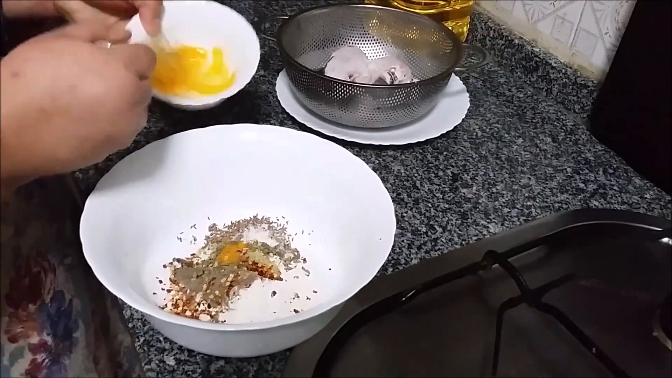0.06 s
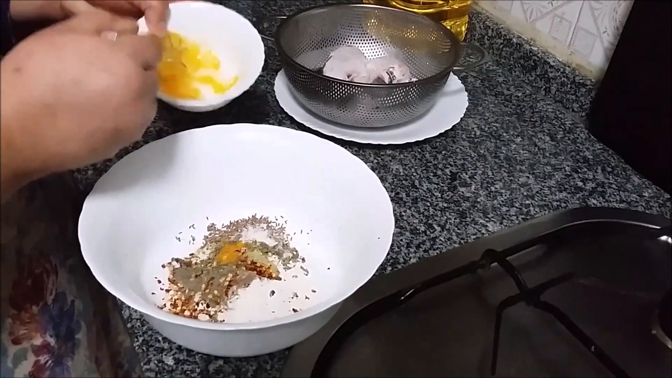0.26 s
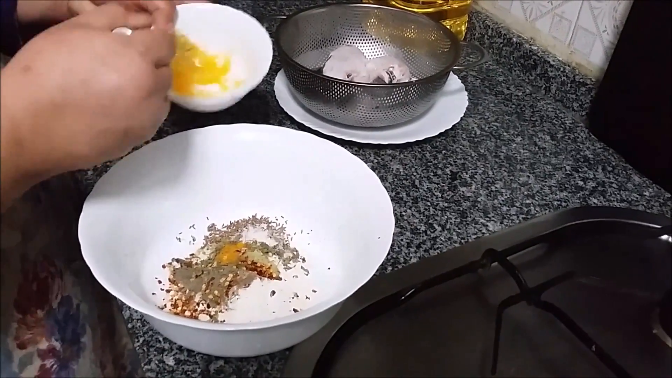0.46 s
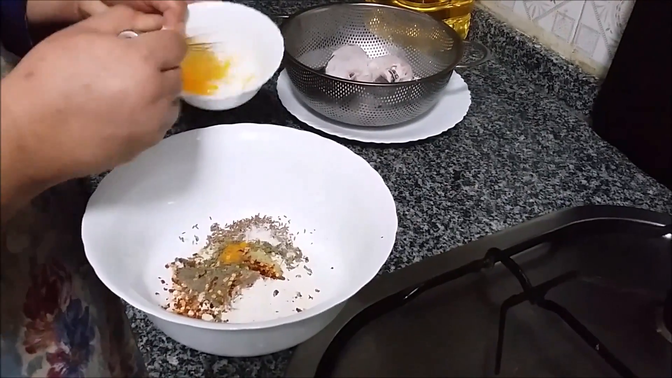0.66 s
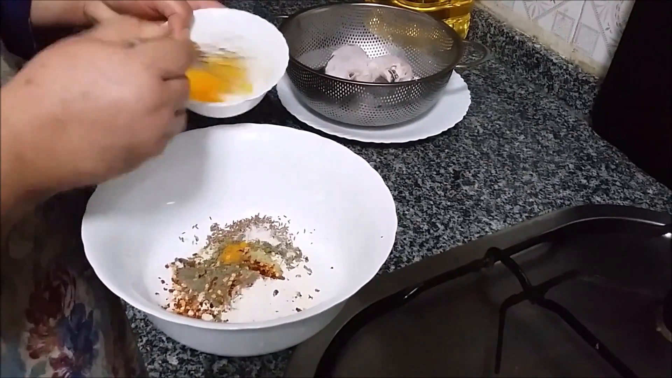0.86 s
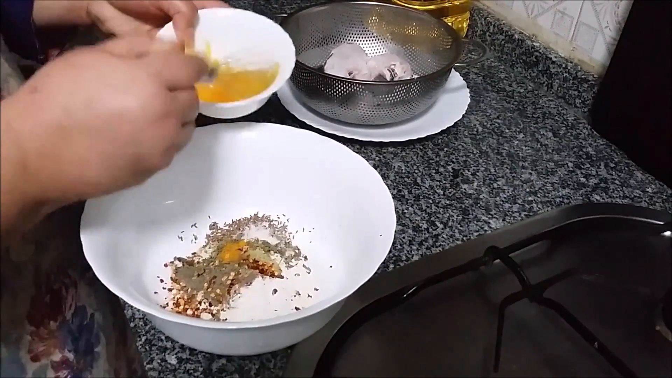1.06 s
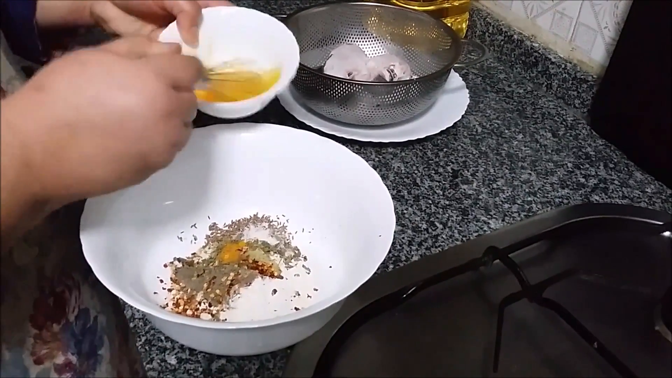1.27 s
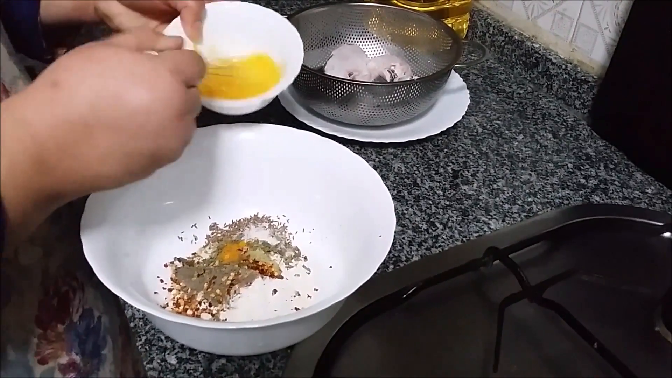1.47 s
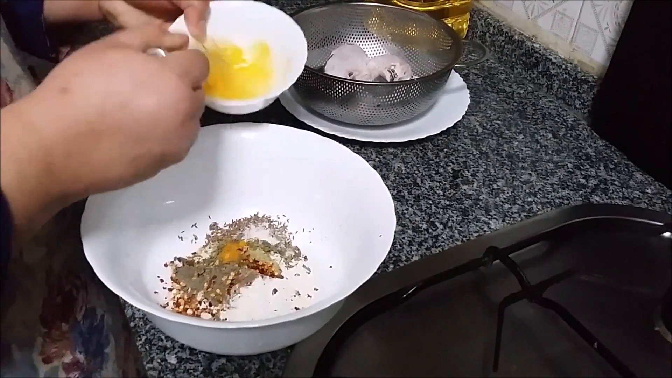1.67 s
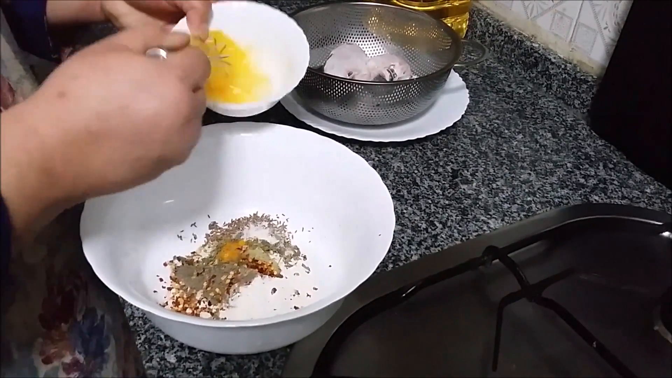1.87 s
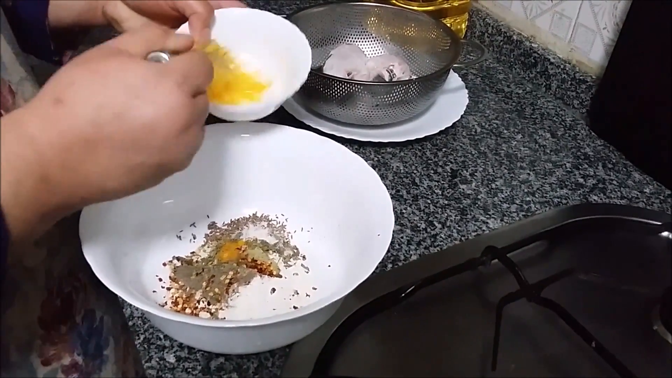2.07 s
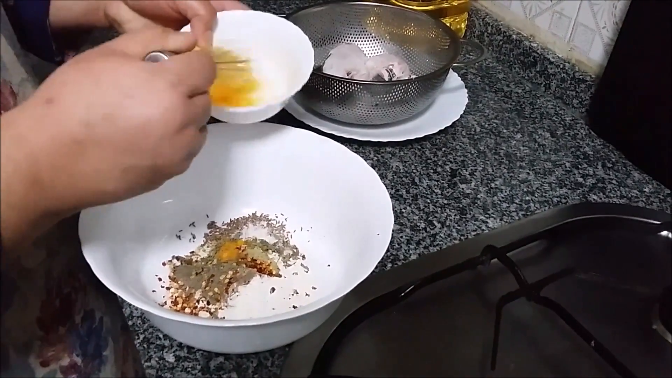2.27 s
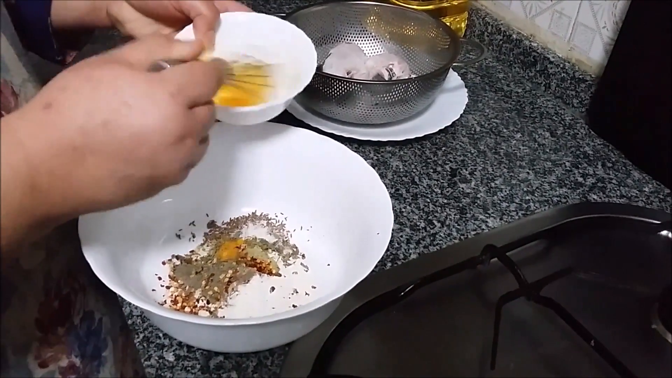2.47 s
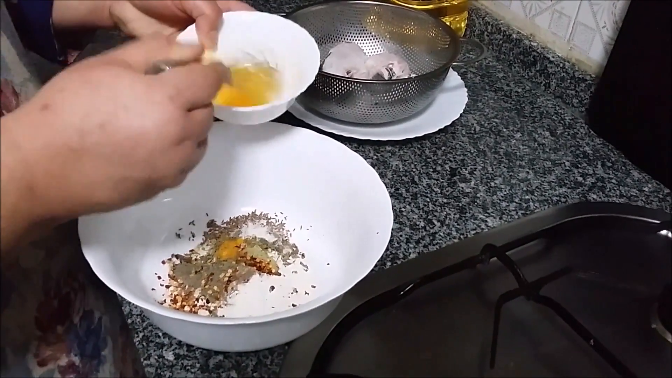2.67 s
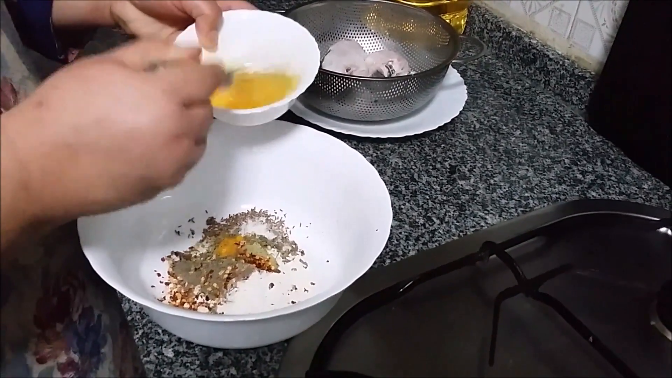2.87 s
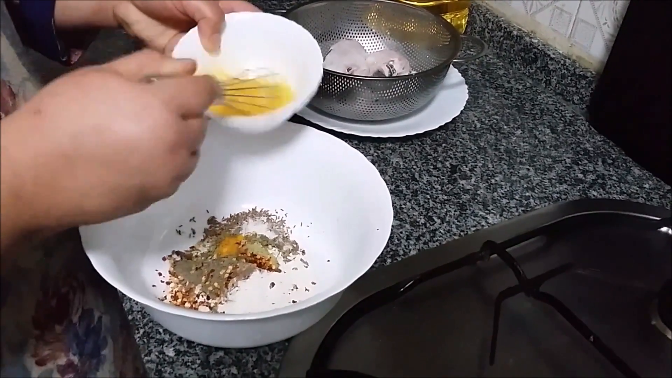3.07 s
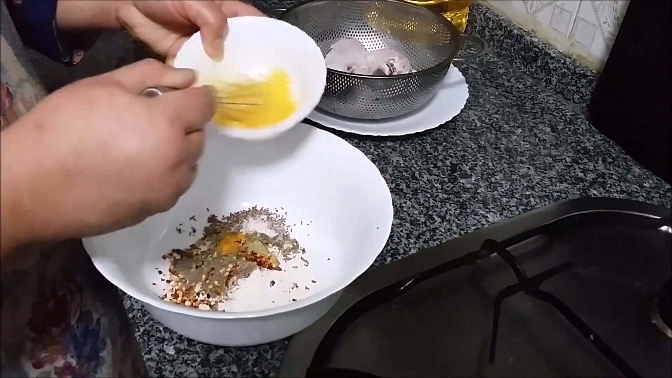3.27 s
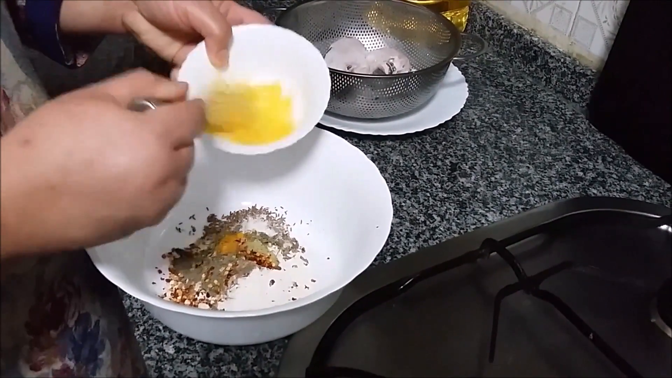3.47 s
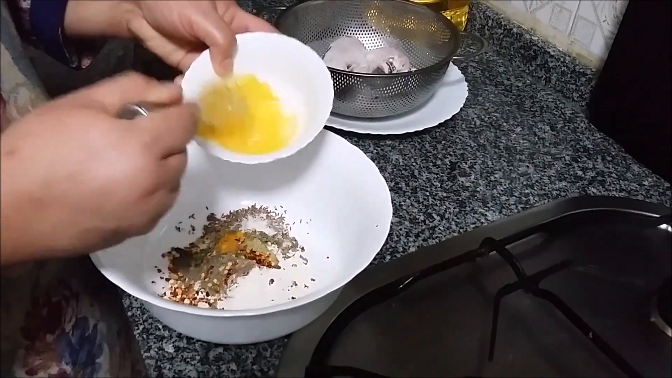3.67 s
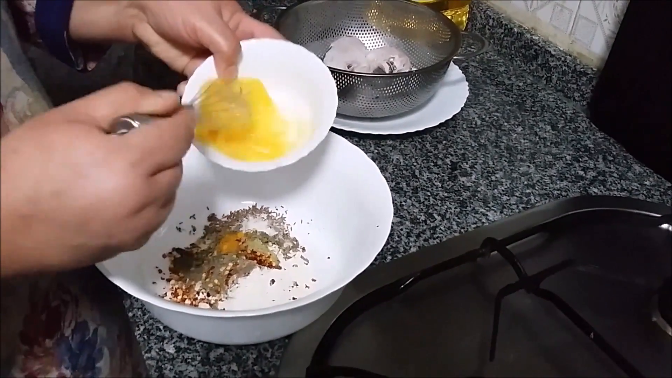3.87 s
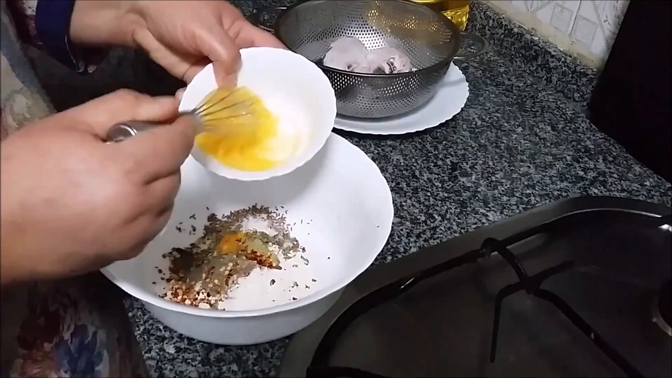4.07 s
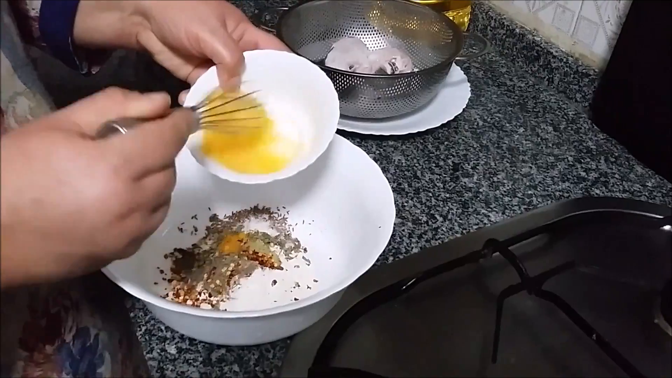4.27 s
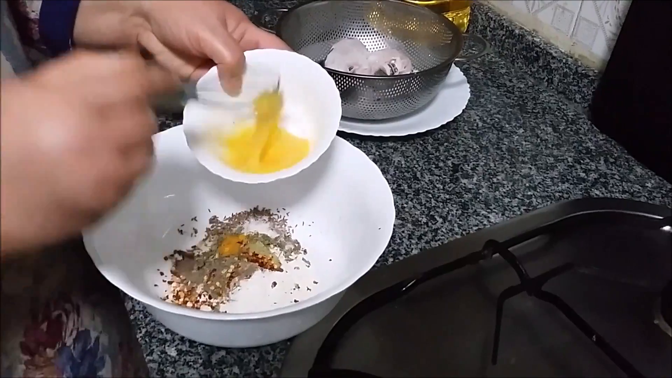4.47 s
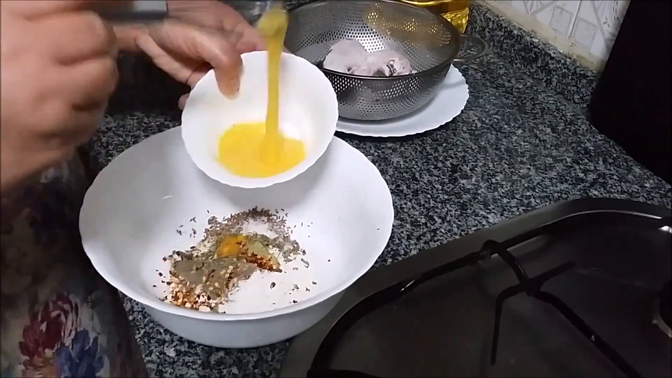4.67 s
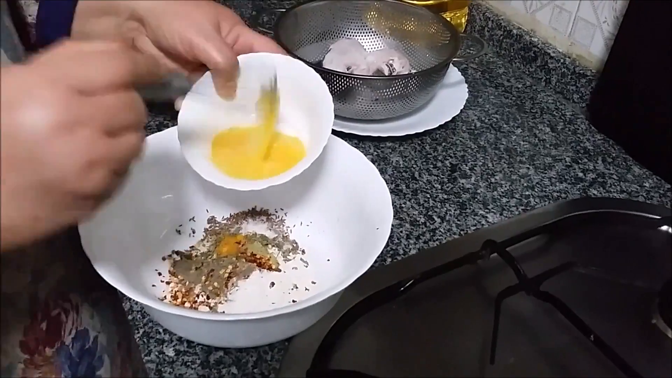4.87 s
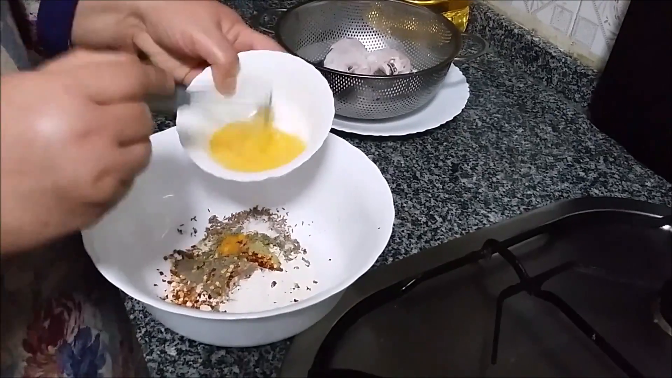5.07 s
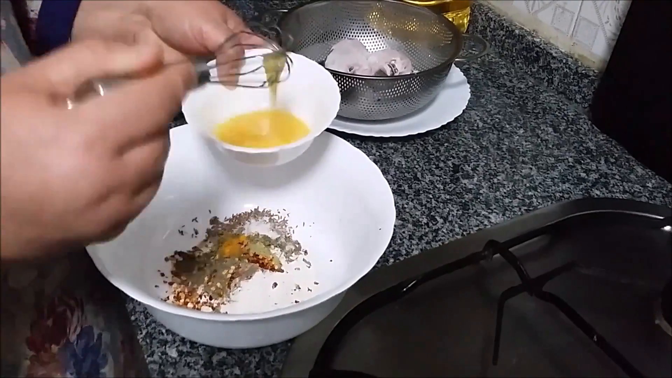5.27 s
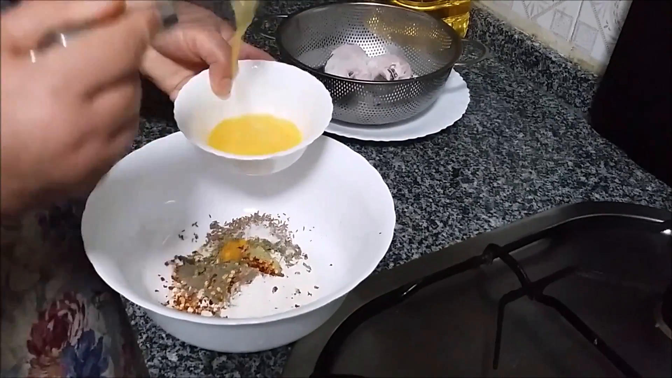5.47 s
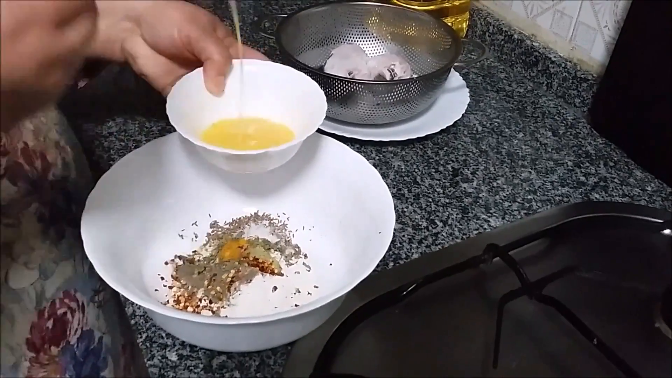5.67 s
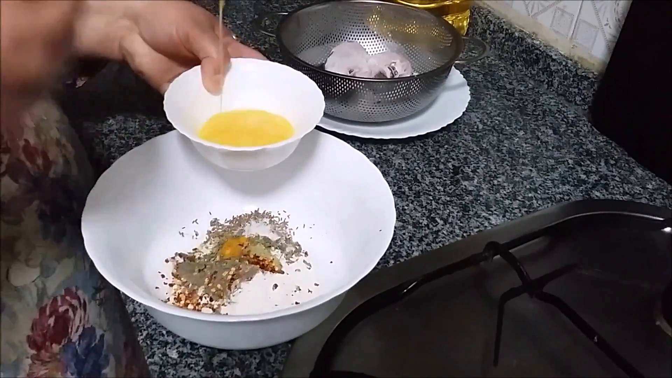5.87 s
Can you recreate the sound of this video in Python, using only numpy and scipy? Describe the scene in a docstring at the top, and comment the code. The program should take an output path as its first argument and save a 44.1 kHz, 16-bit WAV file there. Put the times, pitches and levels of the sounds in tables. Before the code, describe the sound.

A wire whisk beats egg in a small hand-held bowl, heard close in stereo in a hard-walled home kitchen. From 0 to about 4.3 s it runs at roughly five and a half turns a second. Each turn is a quick pair of touches: a wet dip, then a bright, hissy sweep up the wall about 45 ms later, with a hollow squelch and light wire ring. Some turns slap the egg, notably at 0.15 and 2.3 s. At 1.28 s the bowl knocks other dishes: a loud crack, dull clatter and clear bell-like ring near 1.1 and 2 kHz, fading over half a second. Scrapes soften and get wetter later; soft hand rubs come at 3.3-3.5 s. Four hard, popping slaps land at 3.76, 3.94, 4.12 and 4.3 s, mostly growing louder. A faint touch follows at 4.5 s, then tiny drips at 5.0 and 5.18 s over low, steady room noise.

```python
"""A wire whisk scrapes a small hand-held bowl and beats an egg, five and a half turns a second.
Each turn dips through the egg and sweeps up the wall: stick-slip clicks drive hiss, hollow, wall and wires.
Some turns slap the egg, ringing the air in the bowl; once the bowl knocks other dishes and they ring.
After four hard slaps the whisk is lifted and the egg drips back, each drop ringing a tiny air pocket.
Rubs of the hand and steady room noise lie below; echoes of a hard-walled kitchen surround the beating."""
import sys
import numpy as np
from scipy import signal
from scipy.fft import rfft, irfft
from scipy.io import wavfile

SR = 44100
rng = np.random.default_rng(int(sys.argv[2]) if len(sys.argv) > 2 else 0)


def wav_record(signal):
    """Record a signal, one row per channel, as 16-bit PCM in the file named by sys.argv[1]."""
    frames = np.transpose(np.atleast_2d(signal))
    bounded = np.clip(frames, -1, 1)
    # unit amplitude maps onto the largest positive 16-bit level
    quanta = np.round(bounded * 32767).astype(np.int16)
    wavfile.write(sys.argv[1], SR, quanta)


N = 260838

# Room noise spectrum: f/Hz, relative density/(dB per Hz)
HUSH_SPECTRUM = [(25, -13), (90, 0.1), (150, 0), (210, -4), (310, -1), (700, -12), (1400, -16), (4600, -25),
                 (5400, -33), (16000, -36)]
HUSH_RMS_DB = -64.5
# Left-right likeness of noise: f/Hz, correlation/1
EAR_LIKENESS = [(30, .6), (80, .93), (320, .88), (900, .3), (3000, 0)]
# Kitchen reverberation: f/Hz, t60/s
ROOM_T60 = [(100, 0.21), (500, 0.8), (1500, 0.42), (4500, 0.42), (8000, 0.27), (15000, 0.41)]
RECORD_EDGE_HZ = 15900

# Hand shifting its hold on the bowl: t/s, half-length/s, level/dB, f/Hz
HAND_SHIFTS = [(3.32, 0.071, -51.5, 396), (3.42, 0.1, -60.5, 110), (3.488, 0.031, -57, 308)]

# Bowl knocking other dishes: t/s, level/dB
DISH_KNOCKS = [(1.2848, -14)]
# Dish modes: f/Hz, relative level/dB, t60/s, left minus right/dB
DISH_MODES = [(311, -12, .45, 0), (344, -11, .4, 0), (425, -6, .4, 1), (537, -12, .4, 0),
              (735, -12, .45, 0), (922, -11, .5, 2), (1120, 1, .68, 6), (1252, -4, .22, 2),
              (1435, -7, .2, 2), (2070, -4.5, .72, -4), (3214, -19, .5, 0), (4600, -19, .25, 0),
              (7572, -21, .2, 2)]
# Dull clatter spectrum: f/Hz, relative density/(dB per Hz)
CLATTER_SPECTRUM = [(45, -34), (85, -10), (130, -6), (215, -19), (340, -5), (600, -4), (1300, 0),
                    (1800, -5.5), (2600, -16), (5000, -23), (7500, -21), (9000, -44.5), (16000, -51.5)]

# Egg dripping back: t/s, f/Hz, level/dB
EGG_DRIPS = [(4.99, 2590, -55.5), (5.178, 1317, -45.5), (5.18, 2660, -53.5)]

# Wet slaps: t/s, level/dB, hollow f/Hz, bursting air pocket f/Hz
EGG_SLAPS = [(0.1555, -30.5, 1260, 1800), (0.524, -40, 1260, 880), (0.872, -40.5, 1380, 2980),
             (1.924, -41, 1360, 5230), (2.2989, -31, 1530, 6980), (3.024, -35.5, 1200, 2104),
             (3.7555, -28.5, 1520, 1950), (3.9432, -27, 1240, 2600), (4.121, -23.5, 1620, 4800),
             (4.305, -21, 1350, 750)]
# Air resonances above the hollow: f/Hz, width of one filter pass/Hz
AIR_MODES = [(2700, 520), (4700, 1200), (7100, 1000)]
# Levels before the burst lift, hollow then AIR_MODES: level/dB
SLAP_MODE_LEVELS_DB = [1, 0, -2.5, -9.5]
BURST_LIFT_DB, BURST_SPREAD_OCTAVES = 9.5, 0.45  # lifts resonances near the pocket's pitch

# Turns of the whisk: dip t/s, dip length/s, dip level/dB, dip-to-sweep lag/s, sweep level/dB
WHISK_TURNS = [(0.012, 0.018, -44.5, .026, -37), (0.158, 0.013, -37, 0.043, -31.5),
               (0.329, 0.021, -40.5, .047, -30), (0.512, .027, -40.5, 0.042, -33),
               (0.69, 0.021, -38, .046, -32.5), (0.873, 0.015, -36.5, .04, -32),
               (1.048, .026, -39, 0.05, -32.5), (1.222, 0.045, -41.5, 0.051, -31.5),
               (1.403, .023, -36, 0.048, -33.5), (1.586, 0.017, -36.5, 0.036, -32.5),
               (1.754, .033, -39, 0.047, -34), (1.938, 0.026, -35.5, 0.046, -35),
               (2.126, 0.015, -37.5, 0.042, -35.5), (2.299, 0.017, -38, 0.042, -33.5),
               (2.483, 0.011, -36, 0.038, -35), (2.663, 0.012, -39, .045, -38.5),
               (2.841, 0.011, -38.5, .047, -38.5), (3.024, .013, -36.5, .047, -38.5),
               (3.206, 0.013, -38, 0.044, -33.5), (3.395, 0.0079, -39.5, 0.038, -39.5),
               (3.573, 0.0095, -37.5, 0.039, -39), (3.755, 0.01026, -36.5, 0.038, -41.5),
               (3.945, 0.0087, -41.5, 0.033, -41), (4.325, 0.0075, -37.5, 0.034, -42.5)]
# Brief extra touches of the whisk on the bowl, mostly just before a dip, one faint touch at the end:
# t/s, length/s, level/dB, wire level/dB re stroke, pocket level/dB re stroke
EXTRA_TOUCHES = [(0.0, 0.016, -37, -18.5, 2), (1.201, .014, -29.5, 5, -9.5),
                 (1.922, 0.016, -39, -14.5, -9.5), (2.105, 0.017, -36, -18, 7),
                 (2.468, 0.0099, -34.5, -24, -8), (2.641, 0.0089, -38, -21, -10),
                 (4.51, .01, -53, -18, -12)]
# Ring of the wires on the sweep: t/s, level/dB re stroke
WIRE_RING = [(0.2, -10.5), (0.55, 2), (2.0, -0.5), (2.17, -28), (3.07, -23), (3.25, -8), (3.6, -7.5),
             (3.8, 0.5)]
# Hollow the whisk opens in the egg: t/s, f/Hz
HOLLOW_PITCH = [(0.2, 1300), (1.05, 1534), (1.45, 1250), (1.8, 1570), (2.5, 1410), (3.1, 1320), (3.7, 1490),
                (3.98, 1090), (4.33, 896)]
# Scrape spectrum: f/Hz, relative density/(dB per Hz)
SCRAPE_SPECTRUM = [(150, -33.5), (400, -10), (750, -17), (1300, -6), (2000, 3), (2600, 1.5), (3500, 2),
                   (4700, 1.5), (6300, -6), (7300, -8.5), (8700, -7.5), (11000, -22), (14000, -18.5),
                   (16000, -41)]
# Whisk wire modes: f/Hz, relative level/dB, t60/s
WIRE_MODES = [(1110, -15, .2), (3070, -8, .09), (3180, -11, .07), (5270, -11, .04), (5520, -3, .05),
              (5610, 0, .07), (6380, -15, .04), (8580, -16, .05)]
# Bowl wall damped by hand and egg: f/Hz, width of one filter pass/Hz, level/dB re hollow
WALL_MODES = [(415, 370, -24), (675.7, 110, -14.5), (1152, 110, -7)]

SWEEP_LENGTH_S = 0.012
BRUSH_LEAD_S, BRUSH_RE_DIP_DB = 0.011, -10.5  # leading wire brushes the egg before each dip
# Relative squelch; extra touches stir little egg. Squelch of the turns grows as the egg loosens.
DIP_SQUELCH_DB, SWEEP_SQUELCH_DB, TOUCH_SQUELCH_DB = 2.5, -3, -8
FROTH_DB_PER_S = 1.81
DIP_WIRES_DB = -30.5  # re stroke; egg damps the wires
SWEEP_PITCH_RATIO, HOLLOW_SCATTER_OCTAVES = 1.1, 0.074  # hollow is smaller on the sweep
POCKET_DB, POCKET_SCATTER_DB = -8.5, 2.5  # air pockets between wires, re stroke


def amp(db):
    """Decibels to gain."""
    return 10 ** (np.asarray(db) / 20)


def unit(x):
    """Scales to a mean channel energy of one."""
    return x / np.sqrt(np.mean(np.sum(x ** 2, -1)) + 1e-20)


def read(points, hz):
    """Reads a table on a log-frequency axis."""
    f_hz, value = np.transpose(points)
    return np.interp(np.log(hz + 1), np.log(f_hz + 1), value)


def at_time(points, t_s):
    """Reads a table on a linear time axis."""
    return np.interp(t_s, *np.transpose(points))


def left_right(db):
    """Gains that raise the left and lower the right by the same dB."""
    return amp([[db], [-db]])


def add(mix, t_s, sound):
    """Mixes a stereo sound in at t_s."""
    part = mix[:, max(round(t_s * SR), 0):][:, :sound.shape[1]]
    part += sound[:, :part.shape[1]]


def convolve(x, response):
    """Convolves each channel, keeping the length."""
    return signal.fftconvolve(np.atleast_2d(x), np.atleast_2d(response), axes=1)[:, :x.shape[-1]]


def colour(points, size=2048):
    """Causal minimum-phase impulse response with the given spectrum."""
    hz = abs(np.fft.fftfreq(size, 1 / SR))
    log_gain = np.log(amp(read(points, hz)))
    return np.fft.ifft(np.exp(np.conj(signal.hilbert(log_gain)))).real


def resonate(x, hz, width_hz):
    """Band-pass resonance applied twice, for steep skirts."""
    b, a = signal.iirpeak(min(hz, .45 * SR), hz / width_hz, SR)
    return signal.lfilter(b, a, signal.lfilter(b, a, x))


def ring(t, hz, t60_s):
    """One mode: an exponentially dying sine."""
    return amp(-60 * t / t60_s) * np.sin(2 * np.pi * hz * t)


def paired_noise(size):
    """White noise in two ears, alike in the bass and unrelated in the treble."""
    left, other = rfft(rng.standard_normal((2, size)))
    same = np.clip(read(EAR_LIKENESS, np.fft.rfftfreq(size, 1 / SR)), -1, 1)
    right = same * left + np.sqrt(1 - same ** 2) * other
    return irfft(np.array([left, right]), size)


def hush():
    """Steady low room noise: paired noise shaped by a fixed spectrum."""
    gain = amp(read(HUSH_SPECTRUM, np.fft.rfftfreq(N, 1 / SR)))
    noise = irfft(rfft(paired_noise(N)) * gain, N)
    return amp(HUSH_RMS_DB) * np.sqrt(N) * unit(noise)


def kitchen(x, first_s=0.0022, echoes_per_s=5000, linger_db=-29, linger_t60_s=3.23, linger_top_hz=3300):
    """Dense echoes off tiles, each band dying at its own rate, over a faint, dull, longer tail."""
    size = 2 * SR
    taps = rng.standard_normal((2, size)) * (rng.random((2, size)) < echoes_per_s / SR)
    taps *= np.arange(size) > first_s * SR
    hz, t, bands = signal.stft(taps, SR, nperseg=256)
    hz = hz[:, None]
    main = amp(-60 * t / read(ROOM_T60, hz))
    linger = amp(linger_db - 60 * t / linger_t60_s) / (1 + (hz / linger_top_hz) ** 2)
    response = signal.istft(bands * (main + linger), SR, nperseg=256)[1]
    return convolve(x, unit(response))


def moving_echoes(x, count=3):
    """Crossfades between independent echo patterns, so the echoes change gradually; both sides reach both ears."""
    place = np.linspace(0, count - 1, N)
    out = np.zeros((2, N))
    for k in range(count):
        part = x * np.sqrt(np.maximum(1 - abs(place - k), 0))
        out += .8 * kitchen(part) + .6 * kitchen(part[::-1])
    return out


def handling():
    """Soft low rubs of fingers on the bowl: broadly resonant noise that swells and fades."""
    out = np.zeros((2, N))
    for t_s, half_s, db, hz in HAND_SHIFTS:
        size = int(2 * half_s * SR)
        rub = resonate(paired_noise(size), hz, hz) * np.hanning(size)
        add(out, t_s, amp(db) * np.sqrt(half_s * SR) * unit(rub))
    return out


def knocking(ring_db=-3.5, crack_db=7, crack_decay_s=0.004, clatter_db=-2, clatter_t60_s=0.59,
             build_s=0.011, dish_low_hz=290, right_lag_s=0.00016):
    """Dish meets dish: a crack, long bell modes and a dull clatter that builds and dies."""
    out, t, dull = np.zeros((2, N)), np.arange(SR) / SR, unit(colour(CLATTER_SPECTRUM))
    arrival = np.maximum(t - [[0], [right_lag_s]], 0)  # bowl nearer the left ear
    tones = sum(amp(db) * left_right(side_db / 2) * ring(arrival, hz, t60_s)
                for hz, db, t60_s, side_db in DISH_MODES)
    # crack and bell modes carry little bass; the bass comes with the clatter
    bass_cut = signal.butter(4, dish_low_hz, "highpass", fs=SR, output="sos")
    crack_env = amp(crack_db) * np.exp(-t / crack_decay_s)
    clatter_env = amp(clatter_db - 60 * t / clatter_t60_s) * (1 - np.exp(-t / build_s))
    for t_s, db in DISH_KNOCKS:
        crack = convolve(paired_noise(len(t)) * crack_env, dull)
        clatter = convolve(paired_noise(len(t)) * clatter_env, dull)
        dishes = signal.sosfilt(bass_cut, crack + amp(ring_db) * tones)
        add(out, t_s, amp(db) * (dishes + clatter))
    return out


def dripping(t60_s=0.024):
    """Each drop rings a tiny pocket of air: a short sine with a soft onset."""
    out, t = np.zeros((2, N)), np.arange(SR // 10) / SR
    for t_s, hz, db in EGG_DRIPS:
        plink = ring(t, hz, t60_s) * (1 - np.exp(-t * hz / 2))
        add(out, t_s, amp(db) * np.tile(plink, (2, 1)))
    return out


def bounce(x, share, spread_s, count=8):
    """Direct sound plus early echoes off bowl and counter, different in each ear."""
    taps = np.zeros((2, x.shape[-1]))
    for ear in taps:
        at = (rng.uniform(.05, 1, count) * spread_s * SR).astype(int)
        ear[at] = share * rng.standard_normal(count) / np.sqrt(count)
    taps[0, 0] = taps[1, 3] = 1  # left ear slightly nearer
    return convolve(x, taps)


def slapping(hollow_width_hz=600, side_db=(.5, -1, 2, 2), spray_db=-9, spray_s=0.0064, thud_db=-15):
    """Whisk hits egg: a sharp push and a droplet spray ring the air in the bowl for milliseconds."""
    out, t = np.zeros((2, N)), np.arange(SR // 10) / SR
    for t_s, strength_db, hollow_hz, burst_hz in EGG_SLAPS:
        spray = unit(rng.standard_normal((2, len(t))) * np.exp(-t / spray_s))
        push = signal.unit_impulse(len(t)) + amp(spray_db) * spray
        modes = [(hollow_hz, hollow_width_hz)] + list(AIR_MODES)
        octaves = np.log2(np.array(modes)[:, 0] / burst_hz)
        lift_db = BURST_LIFT_DB * np.exp(-(octaves / BURST_SPREAD_OCTAVES) ** 2)
        levels_db = np.array(SLAP_MODE_LEVELS_DB) + lift_db
        pop = sum(amp(db) * left_right(side) * unit(resonate(push, hz, width_hz))
                  for (hz, width_hz), db, side in zip(modes, levels_db, side_db))
        thud = amp(thud_db) * unit(resonate(push, hz=630, width_hz=420))
        slap = bounce(pop + thud, share=.45, spread_s=.011)
        add(out, t_s, amp(strength_db) * np.sqrt(.005 * SR) * slap)  # level over 5 ms
    return out


def contacts():
    """Whisk touches: t/s, length/s, level/dB, hollow f/Hz, then squelch, wires, pockets as relative dB."""
    chances = rng.standard_normal((len(WHISK_TURNS), 4))
    for (t_s, dip_s, dip_db, lag_s, sweep_db), chance in zip(WHISK_TURNS, chances):
        froth_db = FROTH_DB_PER_S * t_s
        dip_squelch_db, sweep_squelch_db = DIP_SQUELCH_DB + froth_db, SWEEP_SQUELCH_DB + froth_db
        dip_hz, sweep_hz = at_time(HOLLOW_PITCH, t_s) * 2 ** (HOLLOW_SCATTER_OCTAVES * chance[:2])
        sweep_hz *= SWEEP_PITCH_RATIO
        dip_pocket_db, sweep_pocket_db = POCKET_DB + POCKET_SCATTER_DB * chance[2:]
        sweep_wires_db = at_time(WIRE_RING, t_s + lag_s)
        # brush, dip, sweep
        yield (t_s - BRUSH_LEAD_S, BRUSH_LEAD_S, dip_db + BRUSH_RE_DIP_DB, sweep_hz,
               sweep_squelch_db, DIP_WIRES_DB, dip_pocket_db)
        yield t_s, dip_s, dip_db, dip_hz, dip_squelch_db, DIP_WIRES_DB, dip_pocket_db
        yield (t_s + lag_s, SWEEP_LENGTH_S, sweep_db, sweep_hz,
               sweep_squelch_db, sweep_wires_db, sweep_pocket_db)
    for t_s, length_s, db, wires_db, pocket_db in EXTRA_TOUCHES:
        yield t_s, length_s, db, at_time(HOLLOW_PITCH, t_s), TOUCH_SQUELCH_DB, wires_db, pocket_db


def slips(t, length_s, per_s, spread_db, fall):
    """Stick-slip clicks that swell and fade as the wires pass; each side hears its own wires."""
    shape = (2, len(t))
    sign = rng.choice([-1, 1], shape)
    size = sign * amp(spread_db * np.minimum(rng.exponential(1, shape), 4))
    u = t / length_s
    swell = np.minimum(u / .35, 1) * np.exp(-np.maximum(u - .6, 0) / fall)
    return size * swell * (rng.random(shape) < per_s / SR)


def whisking(scrape_db=2, squelch_trim_db=-3.5, hollow_width_hz=500, side_db=2, pocket_width_hz=550):
    """Each stroke's slips hiss on the bowl, sound the hollow, wall and air pockets, and ring the wires."""
    out, t, hiss = np.zeros((2, N)), np.arange(SR // 6) / SR, colour(SCRAPE_SPECTRUM)
    for t_s, length_s, db, hollow_hz, squelch_db, wires_db, pocket_db in contacts():
        drive = slips(t, max(length_s, .004), per_s=6000, spread_db=2.0, fall=0.51)
        shared = drive + 0.78 * drive[::-1]  # squelch reaches both sides
        scrape = amp(scrape_db) * unit(convolve(drive, hiss))
        wall = sum(amp(level_db) * unit(resonate(shared, hz, width_hz))
                   for hz, width_hz, level_db in WALL_MODES)
        hollow = unit(resonate(shared, hollow_hz, hollow_width_hz))
        squelch = amp(squelch_db + squelch_trim_db) * (hollow + wall)
        # new pocket sizes at every stroke
        pockets_hz = [hz * rng.uniform(.85, 1.15) for hz, _ in AIR_MODES[:2]]
        pockets = amp(pocket_db) * sum(unit(resonate(shared, hz, pocket_width_hz)) for hz in pockets_hz)
        metal = unit(sum(amp(level_db) * unit(convolve(drive, ring(t, hz, t60_s)))
                         for hz, level_db, t60_s in WIRE_MODES))
        bright = (scrape + pockets + amp(wires_db) * metal) * left_right(side_db)
        add(out, t_s, amp(db) * np.sqrt(length_s * SR) * (bright + squelch))
    return out


def scene(stroke_room_db=-2.0, slap_room_db=-3):
    """Strokes, slaps and drips with kitchen echoes; hand, knock and room noise added directly."""
    strokes = whisking()
    slaps = slapping() + dripping()
    echoes = moving_echoes(amp(stroke_room_db) * strokes + amp(slap_room_db) * slaps)
    return strokes + slaps + echoes + handling() + knocking() + hush()


def record(dry):
    """The recorder's band limit: a steep linear-phase low-pass."""
    low_pass = signal.firwin(511, RECORD_EDGE_HZ, window=("kaiser", 9), fs=SR)
    return signal.oaconvolve(dry, low_pass[None], "same")


dry = scene()
out = record(dry)
wav_record(out)
```